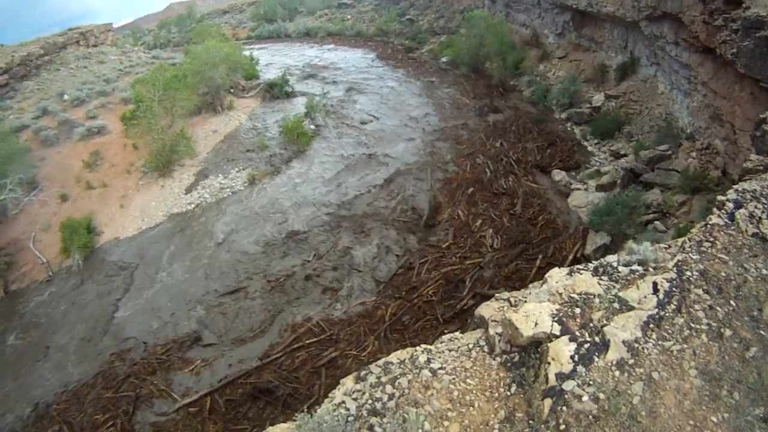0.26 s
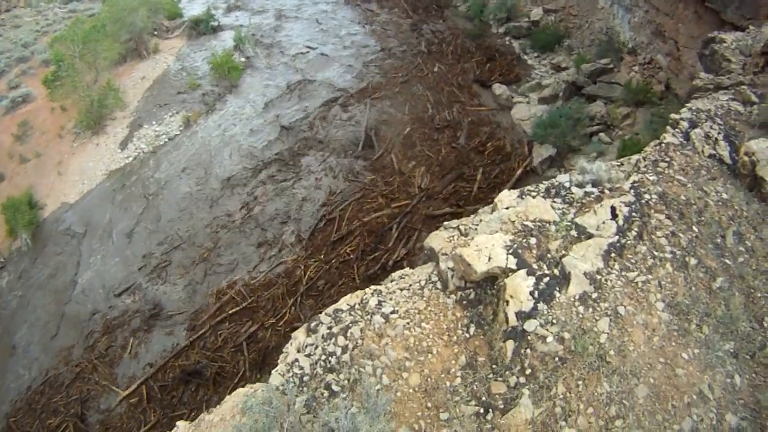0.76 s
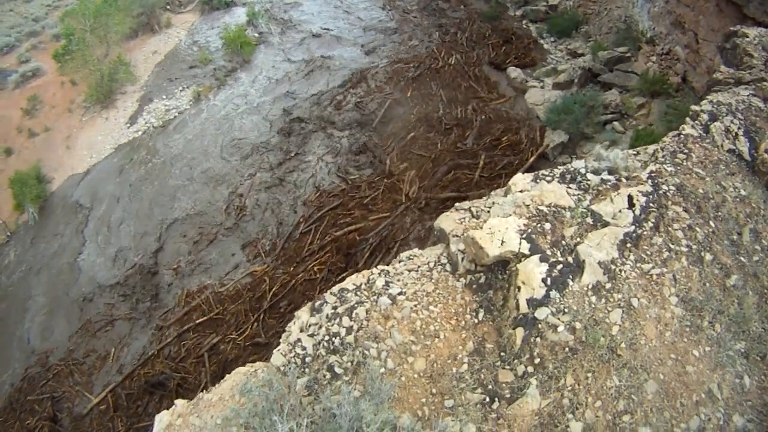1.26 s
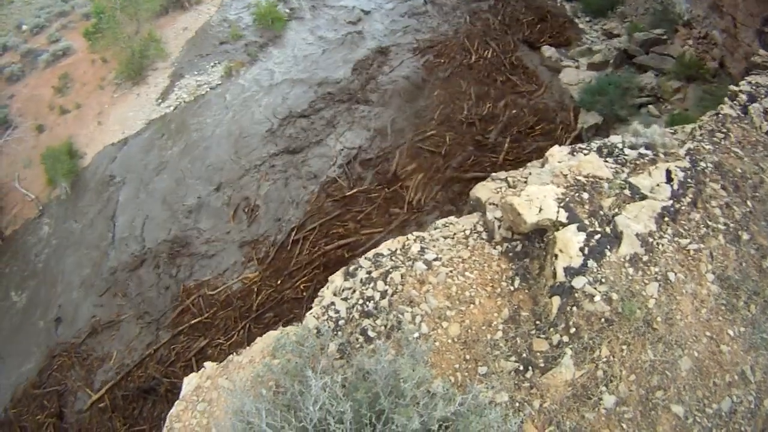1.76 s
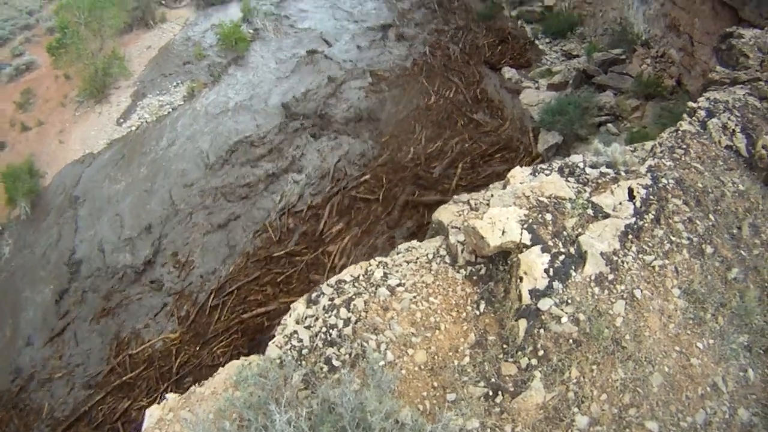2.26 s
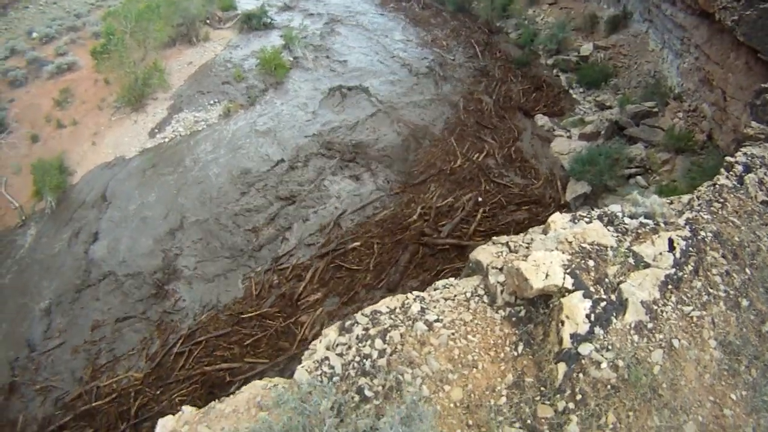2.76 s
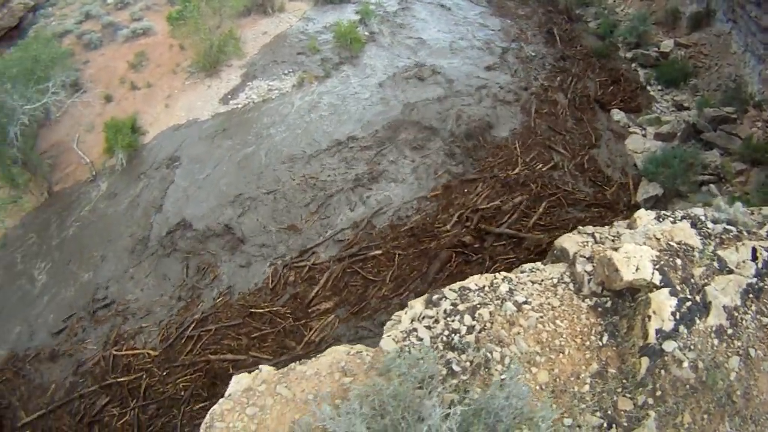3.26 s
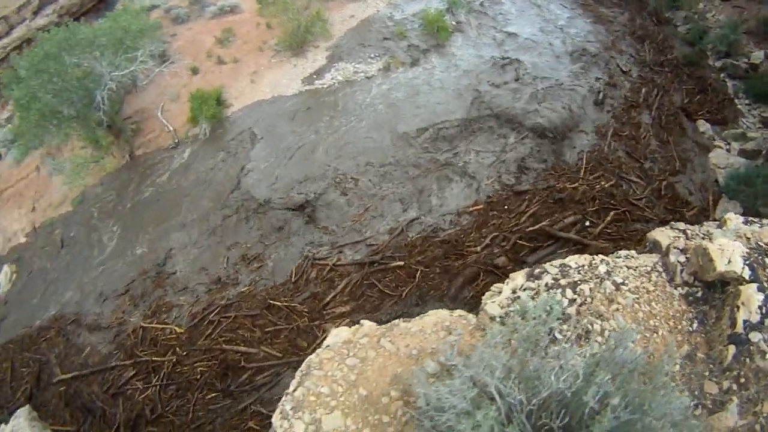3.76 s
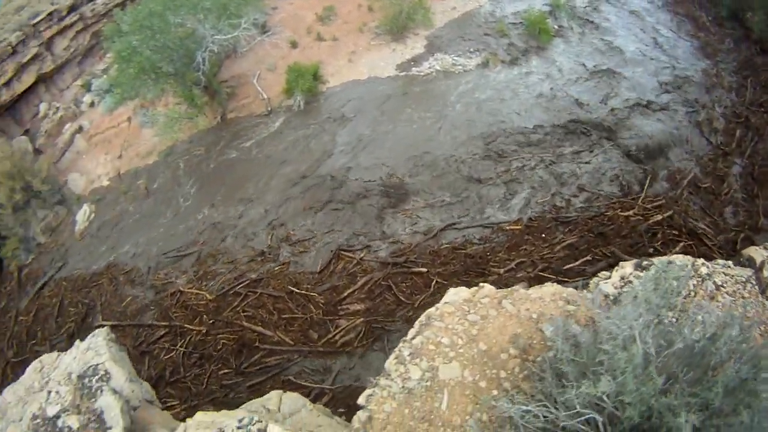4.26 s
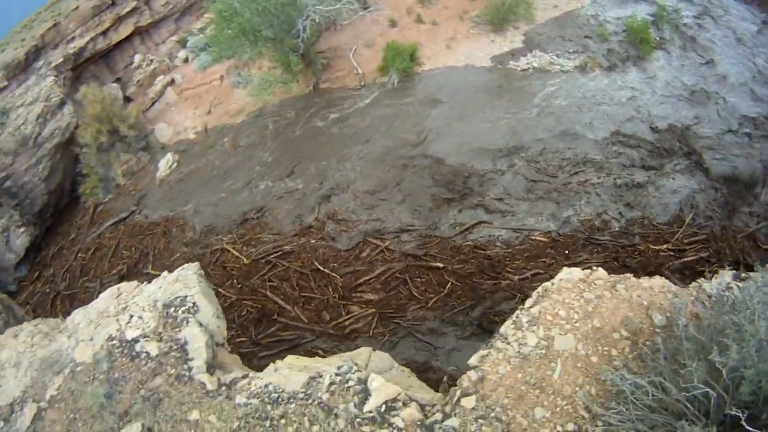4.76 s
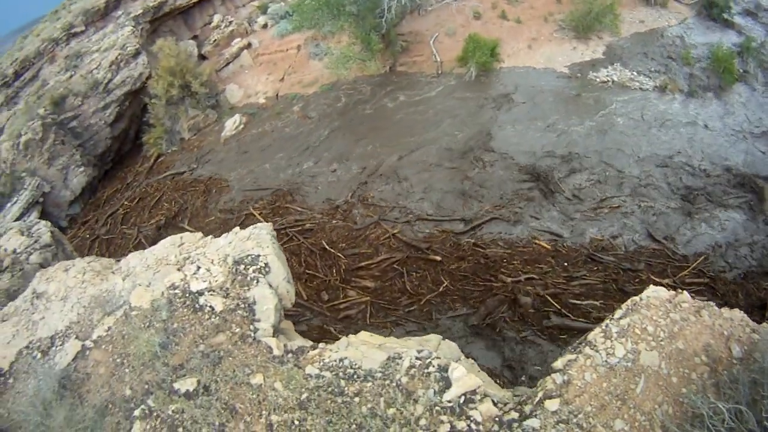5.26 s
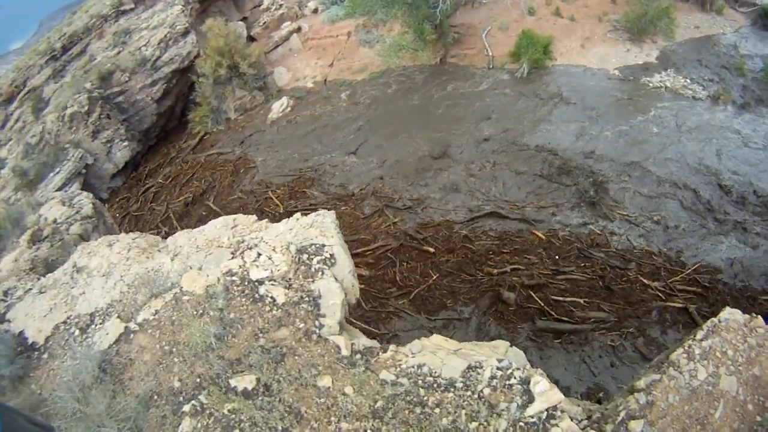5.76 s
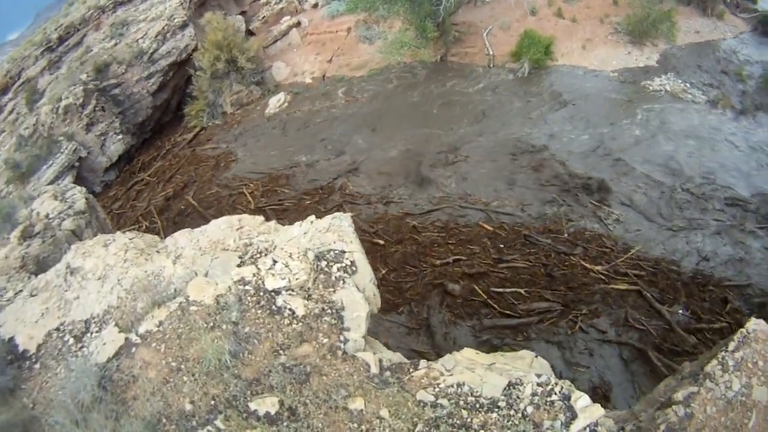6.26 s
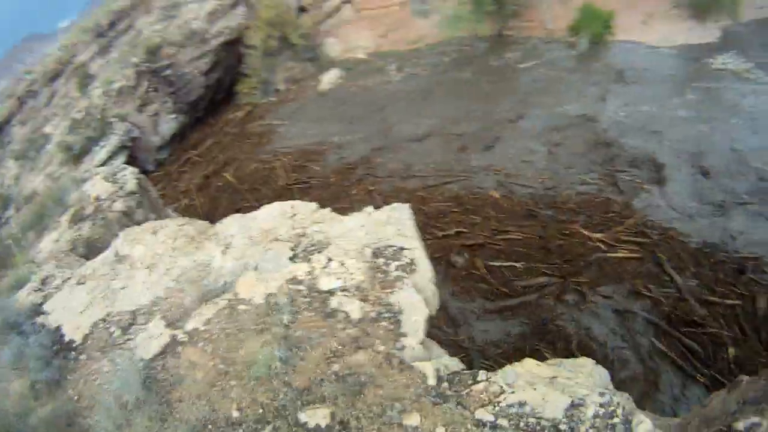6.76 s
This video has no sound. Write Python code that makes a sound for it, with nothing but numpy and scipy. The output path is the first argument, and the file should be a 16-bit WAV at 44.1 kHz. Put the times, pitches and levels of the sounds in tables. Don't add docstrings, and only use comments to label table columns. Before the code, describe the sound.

Distant flood water runs throughout as a low-level, steady, thin roar, hissy and nasal from the plastic shell around the microphone, slightly grainy with splashes and barely changing. At about 0.05 s there is a soft thump, and at 0.14 s a sharp finger tap with a short scrape. Quiet water follows until 1.6 s, when low thuds, shaking and skin scrapes begin. Around 1.9-2.15 s very loud, overloaded knocks crack out, with a loose latch rattling rapidly. Smaller creaks, rubbing and ticks continue to 2.5 s, where a dull double knock lands, then scrapes lead to another knock and shove at 2.82 s. From about 3 to 6.2 s the faint roar is almost alone, with tiny ticks. Handling returns at 6.3 s, thumping and knocking near 6.6 s, rubbing, then a final thud and scrape at 6.92 s.

```python
import sys
import numpy as np
from scipy import signal
from scipy.fft import rfft, irfft
from scipy.io import wavfile
from scipy.ndimage import uniform_filter1d

SR = 44100
rng = np.random.default_rng(int(sys.argv[2]) if len(sys.argv) > 2 else 0)


def put_to_file(sound):
    columns = np.atleast_2d(sound).T
    safe = np.clip(columns, -1, 1)
    whole_steps = np.round(safe * 32767)
    wavfile.write(sys.argv[1], SR, whole_steps.astype(np.int16))


def invert_db(x):
    u = np.asarray(x, float) / 20
    return 10 ** u


N = 309582

# start_s, peak_db, struck_mode_hz, contact_s, fall_db_per_octave
KNOCKS = [
    (0.143, -1, 2700, 0.0038, 8),
    (1.892, 14.5, 3050, 0.0018, 1),
    (1.989, 10.5, 3050, 0.0041, -1.5),
    (2.081, 4.5, 3180, 0.0044, 0),
    (2.54, -11, 1970, 0.0011, 48),
    (2.553, 3.5, 1894, 0.004, 22),
    (2.8237, -1.5, 2260, 0.0034, 3.5),
    (6.59, -9.5, 3300, 0.0042, -1),
]
# start_s, peak_db, contact_s
LATCH_BOUNCES = [(1.908, 10, 0.0011), (1.982, -24, 0.0023), (2.0048, 5.5, 0.00031), (2.0157, 10, 0.00099),
                 (2.0269, 4, 0.0002), (2.058, -23, 0.0036), (2.1058, 10.5, 0.00041), (2.1186, 6, 0.00037),
                 (2.1254, 2.5, 0.00053), (2.1304, -3, 0.00037), (2.135, -10.5, 0.00025),
                 (2.1477, -28, 0.00076)]
# start_s, peak_db, struck_mode_hz, fall_db_per_octave
TICKS = [(0.276, -28, 2270, 37), (0.876, -33.5, 2460, 20), (1.591, -22.5, 1960, 4), (1.727, -11, 2220, 4),
         (2.226, -33, 2020, -6), (2.376, -24, 1800, 27), (2.487, -25, 2090, 12), (2.503, -22.5, 1640, 11),
         (2.593, -19.5, 2130, 23), (2.613, -24, 2100, 22), (2.64, -18.5, 1860, 13), (2.707, -25.5, 1500, 2),
         (2.753, -23, 1940, 8), (3.989, -37.5, 2210, 0), (4.396, -47, 2270, 12), (4.679, -37, 2300, 3),
         (5.449, -38.5, 3500, 11), (6.175, -40, 2250, 15), (6.561, -33, 3600, 2), (6.718, -26, 2000, 12),
         (6.737, -29.5, 2000, 13.5), (6.768, -26, 1490, 10)]
# pitch_hz, level_db, t60_s
CASE_MODES = [(784, -24.5, 0.029), (1325, -0.5, 0.014), (1800, 1.5, 0.012), (2134, 6, 0.0087),
              (3180, 2, 0.016), (3460, -8.5, 0.015), (4955, 3, 0.0091), (5410, -9.5, 0.0062)]
# pitch_hz, wander_share, calm_level_db, gain_db_per_db_of_unrest
SWING_MODES = [
    (47.3, 0.18, -54.5, 1.1632),
    (89.5, 0.17, -54.5, 0.48),
    (270, 0.16, -71.5, 1.3073),
]
# time_s, sway_db
TREMOR = [(0, -39.5), (.5, -45), (1.45, -47.5), (1.7, -33), (2.3, -36), (2.7, -34.5), (2.9, -53),
          (3.3, -53), (3.62, -49), (3.75, -56), (4.5, -50.5), (5.1, -60), (5.53, -48.5), (5.62, -54),
          (6.15, -54), (6.55, -40), (6.75, -40), (7.02, -28)]
# peak_s, level_db, sharpness (0 sway, 1 wobble, 2 hum), fade_s
JERKS = [(0.0, -44, 1.95, 0.064), (.105, -27, 0.4, .03), (.25, -24.5, 0.13, 0.17), (.82, -27.5, .05, 0.051),
         (1.08, -29.5, 0.21, 0.13), (1.61, -6.5, 0.2, 0.046), (1.691, -9, 0.85, 0.061),
         (1.761, -13, .1, 0.037), (1.82, -12.5, 0.47, 0.051), (1.922, -32, .05, .05), (1.99, -16, 1.1, .04),
         (2.07, -30, 1.4, 0.033), (2.13, -20.5, 1.97, 0.038), (2.206, -14.5, 0.21, 0.084),
         (2.5, -17.5, 0.76, 0.024), (2.61, -23.5, 1.96, 0.023), (2.848, -14.5, 0.79, 0.047),
         (6.26, -28, 0.76, 0.043), (6.37, -34, .05, 0.18), (6.371, -40, 1.95, 0.058), (6.6, -4, 0.65, .04),
         (6.592, -15, 1.95, 0.053), (6.689, -22, 0.77, 0.045), (6.709, -10, 0.26, 0.089),
         (6.79, -30, 2.2, 0.055), (6.925, -6, 1.0, 0.063), (6.93, -21, 1.8, 0.075), (2.835, -18, .5, .04),
         (6.98, -13, .05, 0.096)]
# start_s, level_db, pitch_hz, t60_s, sign
SHOVES = [(2.846, -31, 48, .62, 1), (.0485, -20.5, 70, .085, 1), (6.6075, -17, 47, .3, 1),
          (1.5905, -6, 68, .05, 1), (6.581, -8, 68, .055, -1), (6.9205, -9, 140, .028, 1),
          (2.209, -22, 150, .025, 1), (2.500, -24, 170, .025, 1), (2.823, -15, 265, .033, 1),
          (2.8242, -19, 480, .007, -1), (6.772, -22, 262, .07, 1), (6.922, -21, 262, .09, 1)]
# start_s, length_s, level_db, centre_hz, spread_to_other_walls_db
SCRAPES = [(0, 0.036, -40.5, 1930, 1.5), (.143, 0.039, -14, 2100, -7.5), (.183, 0.066, -39.5, 1880, 1),
           (1.588, 0.021, -21, 1800, -6.5), (1.674, 0.076, -24, 2170, 4.5), (1.776, 0.062, -20.5, 1890, 2),
           (2.31, 0.14, -35, 1880, 1), (2.541, 0.0096, -14, 1870, -16), (2.556, 0.018, -29, 1900, -16),
           (2.663, .026, -14.5, 1840, -19), (2.826, 0.057, -23.5, 2140, 6),
           (6.929, 0.04, -17.5, 1750, -0.5), (6.963, 0.089, -32.5, 1790, 3.5)]
CREEPS = [(1.654, 0.031, -11.5, 1840, -4.5), (1.83, 0.054, -27.5, 2000, -4), (.03, 0.11, -42, 1960, -0.5),
          (.2, .1, -42, 2040, 0.5), (2.2, .11, -37, 2040, 3), (2.49, 0.046, -33, 1780, -7),
          (2.57, 0.1, -30, 1960, -2), (2.69, 0.11, -34, 1970, -4), (2.765, 0.067, -19.5, 2090, 5.5),
          (6.69, 0.11, -36, 1870, 1), (6.79, 0.053, -35.5, 2000, -7)]
# hold_start_share, hold_end_share (of the length), start_db, end_db
SCRAPE_SHAPE = (0.25, 0, -11, -12.5)
CREEP_SHAPE = (0.72, 0.7, -17.5, -7)
# pitch_hz, width_hz, level_db, tilt_db_per_octave above GRIP_HZ
RUBBED_WALLS = [(1105, 594, -5.5, -41), (3460, 800, -13, 30), (5090, 720, -20, 30)]
# start_s, end_s
PALM_SPANS = [
    (1.915, 1.985),
    (2.19, 2.79),
]
PALM_DB = [-60, -49]
# pitch_hz, width_hz, level_db
PALM_WALLS = [(804, 285, 0), (3620, 540, 0.5), (2000, 580, 2)]
# pitch_hz, level_db_per_hz
ROAR_COLOUR = [(20, 7), (60, -14), (150, -6.5), (500, -10.5), (1000, -10.5), (1400, -10.5), (2800, -7.5),
               (4200, -16.5), (5200, -10), (5600, -17), (6000, -16.5)]
# pitch_hz, width_hz, level_db
SHELL = [(2260, 330, 11.63), (1790, 1200, 0.44), (3580, 390, 7.6), (4880, 960, 4.55), (1038, 27, 7.3)]
# time_s, level_db, depth of a dip near 1400 Hz (0-1)
ROAR_COURSE = [(0.0, -45.5, 0.1), (0.53, -45.5, 0.16), (1.04, -45.5, 0.97), (1.62, -45, 0.35),
               (3.09, -45.5, 0.35), (5.77, -45.5, 0.04), (7.02, -46, 0.1)]

HOLD_HZ = 12000
CALM_DB = -54
JERK_SPAN_DB, JERK_RISE, OFF_MODE_DB = 26.5, 0.78, 19
KNOCK_PUSH_DB = -56
LATCH_HZ, LATCH_DB_PER_OCTAVE, LATCH_FALL_DB = 2240, 29, 3
LATCH_PUSH_DB, LATCH_PUSH_SLOPE = -8, 0.35
TICK_CONTACT_S, TICK_PUSH_DB = 0.0021, -3
GRIP_HZ = 1950
PALM_EASE_S = 0.028


def knocks():
    rows = contacts()
    out = np.zeros(N)
    t = np.arange(1500) / SR
    modes = len(CASE_MODES) + 1
    cluster = np.repeat([-1, 0, 1], modes) + rng.uniform(-.45, .45, 3 * modes)
    detune = np.exp(.045 * cluster)[:, None]
    noises = rng.standard_normal((len(rows), len(t)))
    for (s, db, hz, contact_s, fall_db, push_db), noise in zip(rows, noises):
        contact_s = max(contact_s, 2e-4)
        touch = np.exp(-(t / contact_s) ** 3) + .15 * np.exp(-t / .002)
        clatter = noise * touch
        for _ in range(4):
            z = rfft(clatter)
            clatter = irfft(z / uniform_filter1d(abs(z), size=5), len(t))
            clatter *= touch / np.sqrt(uniform_filter1d(clatter ** 2, size=30) + 1e-9) ** .5
        clatter[0] += .001 / contact_s * np.linalg.norm(clatter)
        struck = 3 * (CASE_MODES + [(hz, 0.5, .011)])
        f, mode_db, t60 = np.array(struck)[:, :, None].transpose(1, 0, 2)
        ring_db = mode_db - fall_db * abs(np.log2(f / hz)) - 60 * t / t60
        ring = (invert_db(ring_db) * np.sin(2 * np.pi * f * detune * t)).sum(0)
        ring *= 1 - np.exp(-t / 1.6e-4)
        sound = signal.fftconvolve(clatter, ring)[:len(t)]
        wall_push = 2.06 * t / 0.0016 * np.exp(-t / 0.00089)
        sound = sound / abs(sound).max() + invert_db(push_db) * wall_push
        add(out, s - .0004, invert_db(db + 4.5) * sound)
    return out


def contacts():
    rows = [(*row, KNOCK_PUSH_DB) for row in KNOCKS]
    for s, db, contact_s in LATCH_BOUNCES:
        hz = LATCH_HZ * 2 ** (db / LATCH_DB_PER_OCTAVE)
        push_db = LATCH_PUSH_DB - LATCH_PUSH_SLOPE * db
        rows.append((s, db, hz, contact_s, LATCH_FALL_DB, push_db))
    for s, db, hz, fall_db in TICKS:
        rows.append((s, db, hz, TICK_CONTACT_S, fall_db, TICK_PUSH_DB))
    return rows


def shake():
    now = np.arange(N) / SR
    out = np.zeros(N)
    step = now[::64, None]
    s, db, sharp, fade = np.transpose(JERKS)
    jerk_db = db - JERK_SPAN_DB * np.maximum(step - s, (s - step) / JERK_RISE) / fade
    unrest_db = np.interp(step[:, 0], *np.transpose(TREMOR)) - CALM_DB
    levels_db = []
    for k, (_, _, calm_db, gain) in enumerate(SWING_MODES):
        jerked_db = (jerk_db - OFF_MODE_DB * abs(sharp - k)).max(1)
        mode_db = np.maximum(calm_db + gain * unrest_db, jerked_db)
        levels_db.append(np.interp(now, step[:, 0], mode_db))
    for (hz, wander, _, _), level_db in zip(SWING_MODES, levels_db):
        pitch = hz * np.exp(wander * drift(0.3615 * hz))
        swing = np.sin(2 * np.pi * np.cumsum(pitch) / SR)
        out += np.sqrt(2) * swing * invert_db(level_db + 1.76 * drift(0.69 * hz) - 4.0)
    creak_db = (levels_db[1] + levels_db[2]) / 2 - 12.5
    creak = resonate(resonate(rng.standard_normal(N), 157, 107), 145, 250)
    out += invert_db(creak_db) * evened(creak)
    t = np.arange(SR // 2) / SR
    for s, db, hz, t60, sign in SHOVES:
        if db > -12:
            out *= np.interp(now - s, [-.05, -.025, .014, .028], [1, .15, .12, 1])
        thump = np.sin(2 * np.pi * hz * t) * (1 - np.exp(-t * hz * 4))
        add(out, s, 1.5 * sign * invert_db(db - 60 * (t / t60) ** 2) * thump)
    return out


def strokes():
    out = np.zeros(N)
    grit = np.pad(rng.standard_normal(N) * invert_db(1.2 * drift(200)), (0, 900))
    no_bass = signal.butter(5, 850, "high", fs=SR, output="sos")
    for rows, shape in ((SCRAPES, SCRAPE_SHAPE), (CREEPS, CREEP_SHAPE)):
        hold_start, hold_end, start_db, end_db = shape
        for s, length_s, db, hz, spread_db in rows:
            slips = grit[round(s * SR):][:round(length_s * SR)]
            share = np.linspace(0, 1, len(slips))
            level_db = db + np.interp(share, [0, hold_start, hold_end, 1], [start_db, 0, 0, end_db])
            rub = evened(band(slips, hz, 1310) + band(slips, hz, 670))
            for f, width_hz, wall_db, tilt_db in RUBBED_WALLS:
                wall_db = wall_db + spread_db + tilt_db * np.log2(hz / GRIP_HZ)
                rub += invert_db(wall_db) * band(slips, f, width_hz)
            rub = signal.sosfilt(no_bass, rub)
            fade = signal.windows.tukey(len(slips), min(1, 200 / len(slips)))
            add(out, s, invert_db(level_db) * rub * fade)
    return out


def palm():
    out = np.zeros(N)
    for (start, end), db in zip(PALM_SPANS, PALM_DB):
        slips = rng.standard_normal(round((end - start) * SR))
        rub = sum(invert_db(wall_db) * band(slips, f, width_hz) for f, width_hz, wall_db in PALM_WALLS)
        fade = signal.windows.tukey(len(rub), min(1, 2 * PALM_EASE_S / (end - start)))
        add(out, start, invert_db(db) * rub * fade)
    return out * invert_db(3.7 * drift(31))


def flood_roar():
    frames = N // 128 + 5
    a, b, patches = rng.standard_normal((frames, 257, 3)).T
    patches = evened(uniform_filter1d(uniform_filter1d(patches, 6, 0), 20, 1))
    flicker = evened(uniform_filter1d(rng.standard_normal(frames), 8))
    spectra = (a + 1j * b) * invert_db(patches + 0.5 * flicker)
    water = signal.istft(spectra, nperseg=512, noverlap=384)[1][:N]
    splashes = invert_db(8.6 * np.minimum(rng.exponential(1, N), 5))
    splashes *= rng.random(N) < 300 / SR
    splashes *= rng.choice([-1, 1], N)
    water = evened(water) + invert_db(-20.5) * evened(splashes)
    hz = np.fft.rfftfreq(N, 1 / SR)
    colour_db = read(ROAR_COLOUR, hz)
    for f, width_hz, db in SHELL:
        colour_db += db / (1 + (2 * (hz - f) / width_hz) ** 2)
    s, *columns = np.transpose(ROAR_COURSE)
    level_db, dip = (np.interp(np.arange(N) / SR, s, c) for c in columns)
    water -= np.clip(dip, 0, 1) * resonate(water, 1360, 205)
    return evened(irfft(rfft(water) * invert_db(colour_db), N)) * invert_db(level_db + 0.62)


def read(points, hz):
    f, value = np.transpose(points)
    return np.interp(np.log(hz + 1), np.log(f + 1), value)


def evened(x):
    return x / np.sqrt(np.mean(x ** 2) + 1e-20)


def add(mix, s, sound):
    part = mix[round(s * SR):][:len(sound)]
    part += sound[:len(part)]


def drift(top_hz):
    z = rfft(rng.standard_normal(N))
    return evened(irfft(z * np.exp(-(np.fft.rfftfreq(N, 1 / SR) / top_hz) ** 2), N))


def resonate(x, hz, width_hz):
    turn = np.exp(2j * np.pi * np.cumsum(hz * np.ones(len(x))) / SR)
    r = np.exp(-np.pi * width_hz / SR)
    return 2 * (turn * signal.lfilter([1 - r], [1, -r], x / turn)).real


def band(x, hz, width_hz):
    turn = np.exp(2j * np.pi * np.cumsum(hz * np.ones(len(x))) / SR)
    low = signal.butter(3, width_hz / 2, fs=SR, output="sos")
    return evened((turn * signal.sosfilt(low, x / turn)).real)


def scene():
    mono = flood_roar() + shake() + knocks() + strokes() + palm()
    return np.tile(mono, (2, 1))


def low_pass(x):
    return signal.sosfilt(signal.butter(12, 16390, fs=SR, output="sos"), x)


def record(dry):
    power_db = 10 * np.log10(abs(uniform_filter1d(dry[0] ** 2, 200)) + 1e-12)
    fall = np.arange(N) * 60. / SR
    late_db = np.roll(np.maximum.accumulate(power_db + fall) - fall, 300)
    duck_db = 0.34 * uniform_filter1d(np.maximum(late_db + 17.5, 0), 150)
    x = np.clip(dry[0] / invert_db(duck_db), -1.02, 1.02)
    x = signal.oaconvolve(x, signal.firwin(101, 5800, window=("kaiser", 6), fs=SR), "same")
    hz = np.fft.rfftfreq(N, 1 / SR)
    sampled = x * (1 + 2 * np.cos(2 * np.pi * HOLD_HZ * np.arange(N) / SR))
    output_db = np.interp(hz, [6000, 15150, 15400, 18000], [1.0, 2.5, -21, -30])
    held = irfft(rfft(sampled) * np.sinc(hz / HOLD_HZ) * invert_db(output_db), N)
    top = irfft(rfft(held) * (hz > 15330), N)
    held -= top * (1 - np.clip(uniform_filter1d(abs(held), size=800) / .06 - .5, 0, 1))
    loudness = np.clip(uniform_filter1d(abs(held), 400) / 0.5, 0, 1)
    side = invert_db(-26.0) * held * drift(230) * loudness
    mix = np.clip([held + side, held - side], -1, 1)
    return low_pass(mix)


dry = scene()
out = record(dry)
put_to_file(out)
```